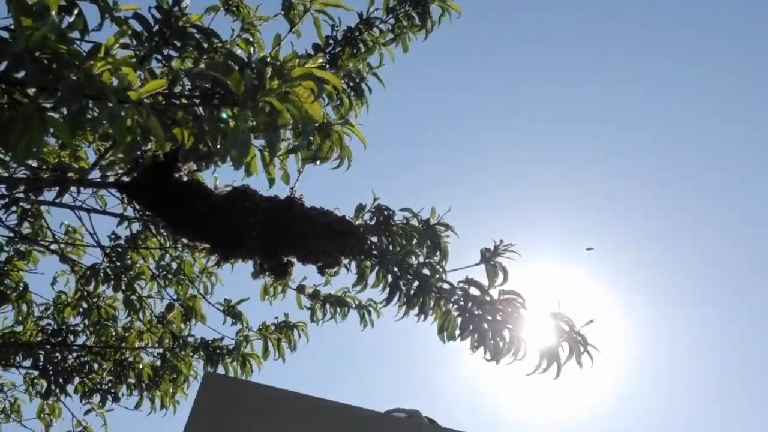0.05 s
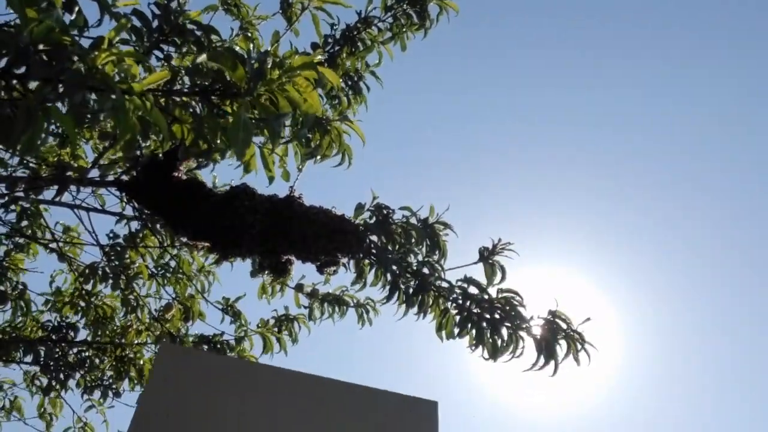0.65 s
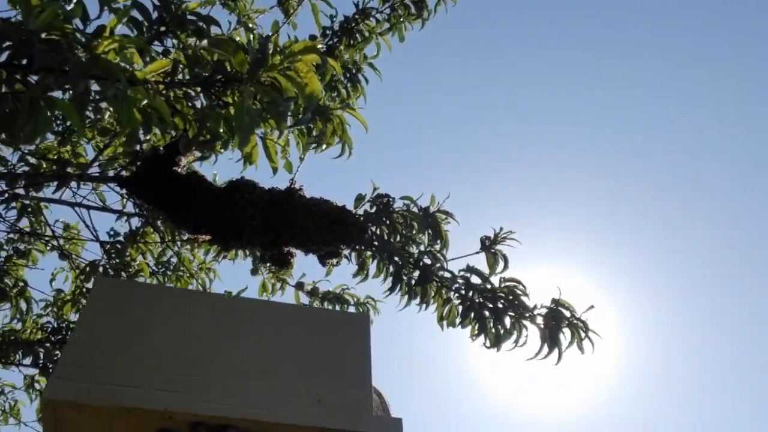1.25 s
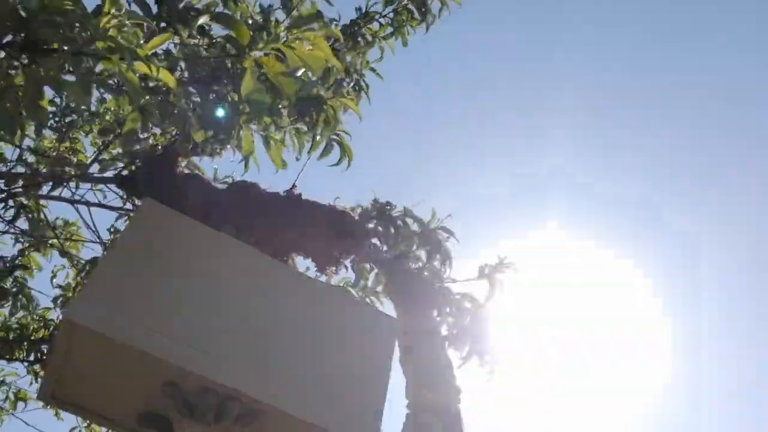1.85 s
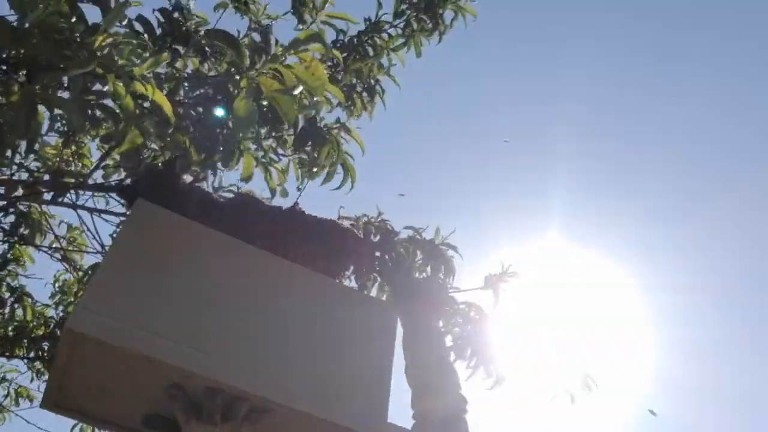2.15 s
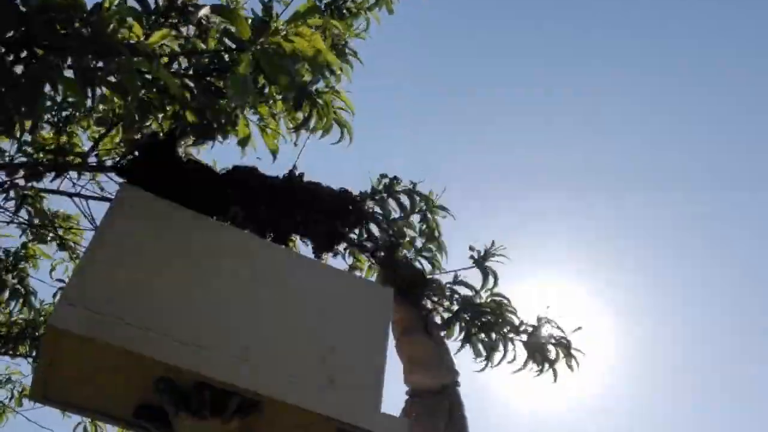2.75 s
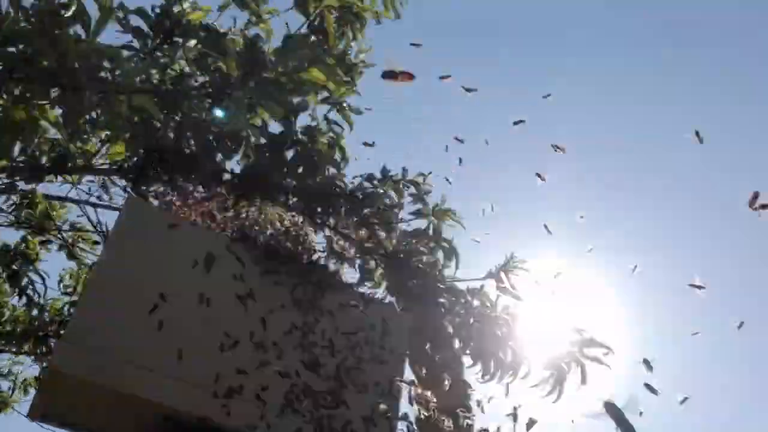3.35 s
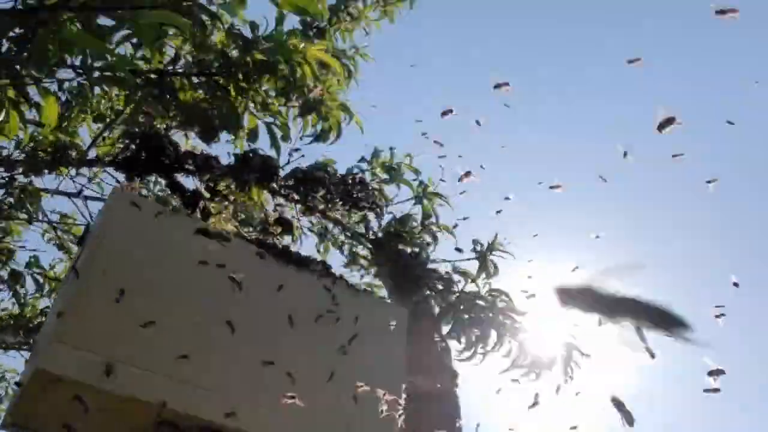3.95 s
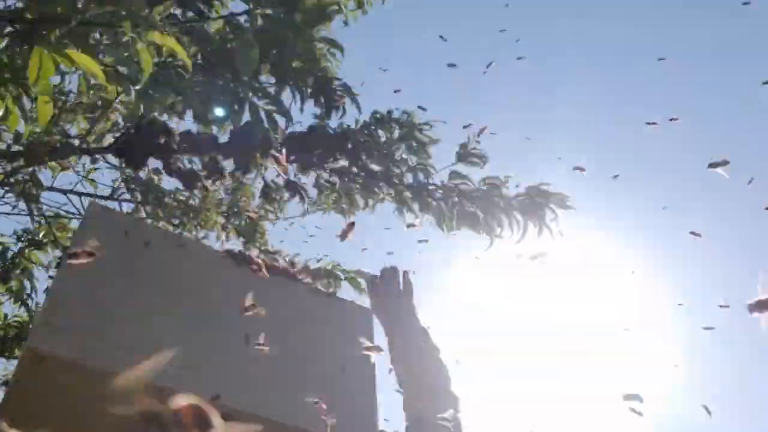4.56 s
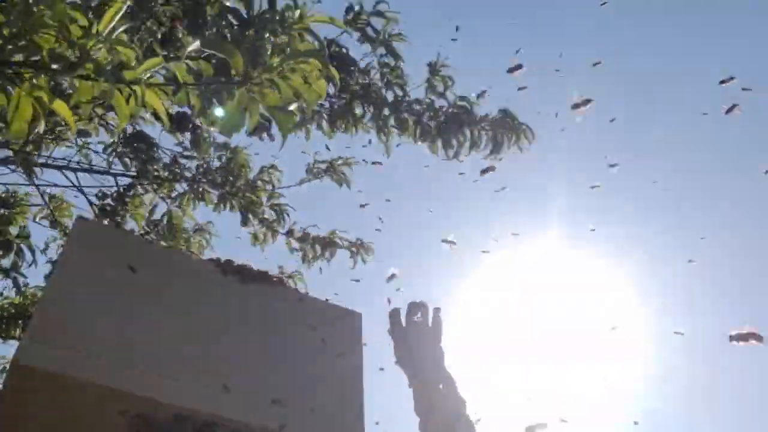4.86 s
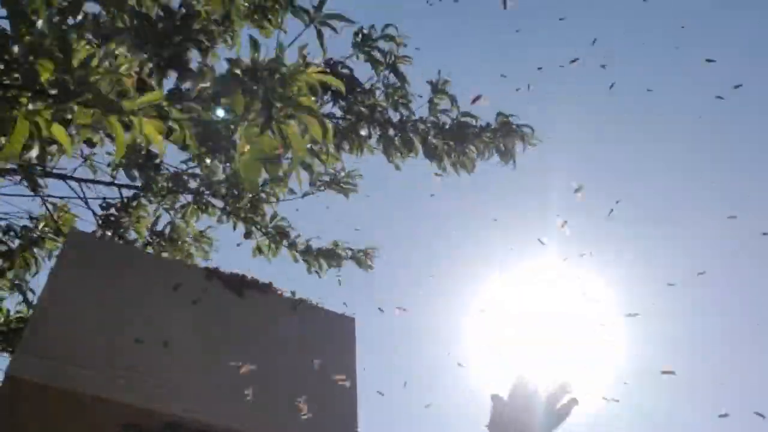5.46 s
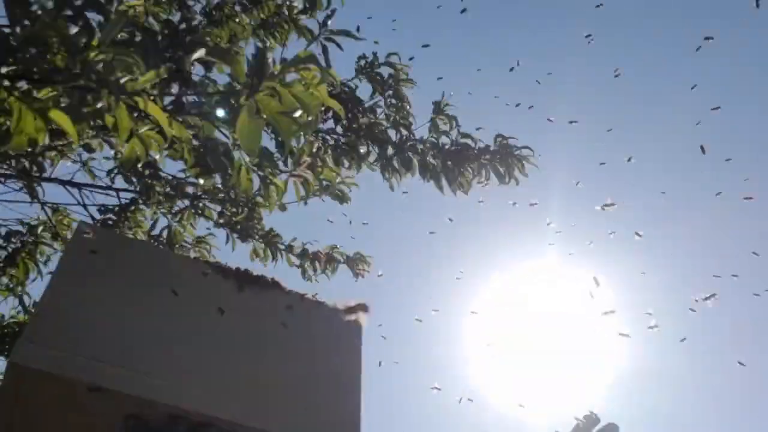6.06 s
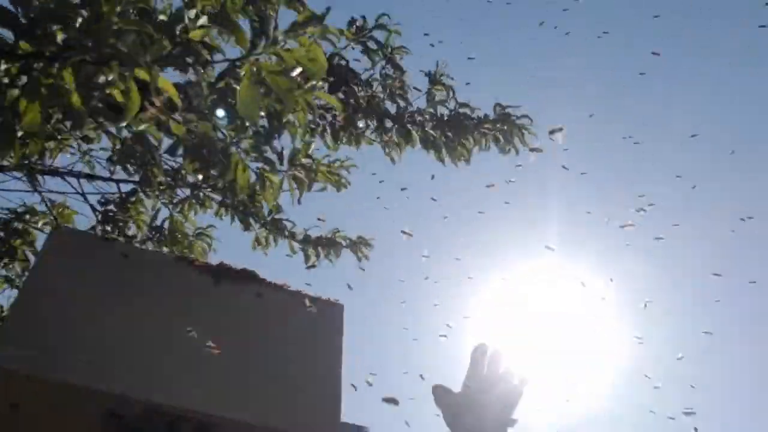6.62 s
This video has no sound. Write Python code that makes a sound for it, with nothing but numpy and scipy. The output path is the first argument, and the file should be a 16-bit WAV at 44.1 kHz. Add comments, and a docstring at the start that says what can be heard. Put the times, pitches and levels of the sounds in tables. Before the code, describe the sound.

Low, gusty wind buffets the microphone throughout, over a faint outdoor hiss. In the first 1.5 seconds, cloth and leaves brush softly as a wooden box is handled, with light knocks, small ticks and faint hollow creaks. The wind grows stronger from 1.5 seconds and thumps hardest around 2.6 seconds, along with two dull bumps of the box. At about 2.8 seconds a branch is shaken: a hissing rush of leaves and wings bursts out and bees begin to buzz. Between 3.5 and 4.5 seconds, leaves crinkle, twigs snap sharply and falling bees patter and tap into the box. From about 4.5 seconds the crinkling stops and the rush gradually settles. The wavering buzz of the flying swarm continues until the end, near 6.7 seconds, with single bees zipping briefly past the microphone over the wind rumble.

```python
"""Wind buffets two microphone ports from the start, and throughout. A beekeeper lifts a wooden box
under a swarm hanging in a tree: cloth and leaves rub, and knocks ring the modes of the box.
At 2.8 s the branch is shaken. Wings and leaves burst into a rush of friction noise, twigs snap,
and falling bees patter into the box. From about 4.5 s the crinkling stops and the rush settles,
leaving the harmonic buzz of the flying swarm, with single bees passing close."""
import sys
import numpy as np
from scipy import signal
from scipy.fft import rfft, irfft, next_fast_len
from scipy.io import wavfile
from scipy.ndimage import uniform_filter1d

SR = 44100
rng = np.random.default_rng(int(sys.argv[2]) if len(sys.argv) > 2 else 0)


def generate_wav(sig):
    """Save sig (samples, or channels by samples) to the path in sys.argv[1] as 16-bit PCM at SR."""
    pcm = np.round(np.clip(np.atleast_2d(sig).T, -1, 1) * 32767).astype(np.int16)
    wavfile.write(sys.argv[1], SR, pcm)


N = 295029
T = np.arange(N) / SR
SHAKE_S, SHAKE_RELEASE_S = 2.822, 0.2  # onset of the shaking; decay time of leaves and falling bees

# Levels in the tables are relative; pan_db is left minus right.
# spectrum of distant outdoor air: frequency_hz, level_db
AIR_SPECTRUM = [(100, 4.5), (400, -4), (750, -8.5), (1100, -14.5), (1600, -26), (3000, -39.5), (8000, -56)]
# spectrum of microphone hiss: frequency_hz, level_db
HISS_SPECTRUM = [(500, -10), (2000, -4.5), (3200, -1.5), (5600, 4.5), (7200, 2.5), (10000, -4), (12500, 1),
                 (16000, -0.5)]
# spectrum of large eddies: frequency_hz, level_db
LARGE_EDDY_SPECTRUM = [(20, -31), (40, -3.5), (64, 3.5), (110, -1.5), (160, -8.5), (230, -16), (400, -42),
                       (1000, -43), (2000, -78)]
# spectrum of small eddies: frequency_hz, level_db
SMALL_EDDY_SPECTRUM = [(80, -5.5), (180, 3), (260, 0), (350, -4), (450, -9), (600, -25.5), (1000, -37),
                       (2000, -61.5)]
# gusts on the ports: start_s, length_s, large_eddy_db, small_eddy_db, pan_db
WIND_GUSTS = [(0, 0.18, -44, -60, 4), (0.189, 0.18, -37.5, -50.5, 6.5), (0.426, .1, -40.5, -67, 10),
              (0.614, 0.064, -47, -49, 2), (0.782, 0.11, -37.5, -69, -6), (0.924, 0.28, -35.5, -74, 0.5),
              (1.223, 0.24, -38, -71, 7), (1.478, 0.13, -29, -41.5, 1.5), (1.628, 0.12, -30.5, -38, 2.5),
              (1.767, 0.16, -30, -41, 3), (1.96, 0.11, -35.5, -48, 0), (2.125, 0.08, -31.5, -39.5, 0.5),
              (2.238, 0.085, -35.5, -39.5, -4), (2.342, 0.14, -38.5, -44, 0.5),
              (2.509, 0.13, -26.5, -31.5, 2.5), (2.648, 0.072, -26, -30.5, 2),
              (2.745, 0.021, -30, -29.5, 5), (2.793, 0.34, -35, -40.5, 0.5), (3.092, 0.22, -33, -42, 3),
              (3.344, 0.11, -30, -41.5, 3), (3.474, 0.093, -33, -32.5, -3.5),
              (3.606, 0.028, -21.5, -34.5, 3), (3.676, 0.083, -32.5, -32.5, 3.5),
              (3.76, 0.063, -30, -43, 2), (3.894, 0.046, -30, -30.5, -8), (4.027, 0.12, -32, -40.5, 9),
              (4.174, 0.16, -34, -39.5, -0.5), (4.382, 0.046, -30, -28, 5), (4.451, 0.048, -32, -38, -3),
              (4.534, 0.073, -35, -41, 3.5), (4.64, 0.075, -35.5, -48, -7), (4.733, 0.043, -34.5, -51, -3),
              (4.792, .04, -36, -50, -10), (4.849, 0.045, -32, -44, 1), (4.908, 0.067, -34, -43.5, 0.5),
              (4.999, 0.029, -32, -33.5, -1.5), (5.046, 0.12, -37, -48, -16), (5.195, 0.018, -34, -39.5, 3),
              (5.237, 0.1, -38, -42, -1.5), (5.364, 0.087, -39.5, -46.5, -1.5), (5.472, 0.025, -35, -48, 4),
              (5.565, 0.13, -38.5, -45, 0), (5.656, 0.075, -31.5, -40.5, -1.5),
              (5.745, 0.067, -35.5, -42.5, 0.5), (5.841, 0.023, -40, -40, -4),
              (5.886, 0.053, -32, -44.5, -0.5), (5.959, 0.02, -38, -43, -6), (6.026, 0.016, -38, -44, 0),
              (6.06, 0.027, -43, -54, -18), (6.109, 0.043, -30.5, -43, -10.5), (6.18, 0.026, -30, -33, 8),
              (6.223, 0.033, -41, -44, -9), (6.332, 0.11, -32.5, -51, -2), (6.428, 0.06, -37.5, -45, -2),
              (6.51, 0.023, -37.5, -55, -8), (6.574, 0.049, -35.5, -46.5, -1),
              (6.648, 0.057, -35, -41, -1.5)]
# puffs of air on the ports: centre_s, level_db, pitch_hz, pan_db
AIR_PUFFS = [(1.704, -16, 67.3, -7), (1.81, -19.5, 59, -6), (1.845, -22, 64.6, -8), (2.19, -25, 76, -2),
             (2.548, -9, 104, 2), (2.6, -18, 108, -1), (2.676, -12.5, 94, 4), (3.098, -16.5, 117, 2),
             (3.209, -18.5, 122, -2), (3.63, -16, 83, 5), (3.795, -16, 82, 5), (4.031, -15.5, 56, 3),
             (4.105, -22, 100, 4), (4.135, -17, 100, -4), (4.553, -22, 64, -2), (4.861, -23.5, 60.6, -3),
             (5.006, -18.5, 85, 3), (5.208, -19, 70.5, 1), (5.246, -33, 72, 4), (6.195, -16.5, 81, -2)]
# spectrum of sliding cloth and leaves: frequency_hz, level_db
BRUSH_SPECTRUM = [(300, 12.4), (1000, 5.8), (2500, 3.4), (5500, 7.8), (7500, 11), (10000, 1), (13000, 8.1),
                  (16000, 6.6)]
# sleeves, leaves and twigs brushing past: centre_s, half_width_s, level_db
BRUSHES = [(.005, 0.015, -53), (.212, 0.0048, -52), (.335, 0.066, -52), (.47, 0.038, -53),
           (.546, 0.017, -43), (.612, 0.037, -41), (.695, 0.047, -48), (.98, 0.083, -53.5),
           (1.11, 0.13, -54.5), (1.39, 0.21, -60.5), (2.7, 0.29, -59), (3.585, 0.019, -40.5)]
# short hollow creaks of the box: centre_s, half_width_s, level_db
CREAKS = [(.153, 0.0064, -44), (.175, 0.0051, -41), (.193, 0.018, -49.5), (.237, 0.0033, -45),
          (.545, 0.035, -48.5), (.615, 0.022, -50.5), (.69, 0.033, -51.5), (1.325, 0.041, -51),
          (1.343, 0.0034, -41), (1.365, 0.017, -50), (1.405, 0.014, -51)]
# low modes of the box: pitch_hz, t60_s, level_db
BOX_MODES = [(189, 0.14, -2.5), (234, 0.099, 0), (298, 0.023, -8)]
# dull bumps of the box against the hand: start_s, level_db, pan_db
BOX_BUMPS = [(0.317, -19.5, 0), (.468, -23, 1), (0.525, -22, -1), (0.541, -24.5, 1), (0.7, -16, 1),
             (2.653, -14.5, -3), (2.748, -16, -4), (3.904, -24, -17), (4.389, -31, 7)]
# taps of hand, twigs and clumps of bees on the box: start_s, ring_db, pitch_hz, crack_db, t60_s
BOX_TAPS = [(.314, -36, 890, -38, 0.04), (.355, -41, 1240, -42, 0.034), (.467, -44, 1300, -40, .02),
            (.475, -40, 1300, -38, .02), (0.545, -38, 1100, -36, 0.016), (0.686, -38, 1730, -53, 0.056),
            (0.698, -45, 1000, -37.5, 0.025), (3.477, -28, 844, -44, 0.04), (3.512, -33, 900, -44, .025),
            (3.533, -33, 1030, -42, 0.025), (3.656, -29.5, 900, -44, 0.054), (3.741, -37, 2100, -35, 0.033),
            (3.746, -29, 990, -40, .03), (3.774, -35, 810, -41, 0.03), (3.889, -37, 804, -29, .04),
            (3.951, -35, 950, -42, .02), (4.156, -25, 690, -26, 0.034), (4.171, -32, 900, -31, 0.052),
            (4.421, -30.5, 775, -34, 0.047), (4.427, -30, 1320, -39, 0.025)]
# ticks of twigs and bees striking: start_s, swing_db, pitch_hz, decay_s, crack_db, crack_hz, pan_db
TWIG_SNAPS = [(.5224, -33.5, 1200, 0.00073, -27, 7000, 2), (0.5397, -38, 1310, 0.00046, -29, 9000, 3),
              (0.552, -36, 1330, 0.00053, -36, 5500, 2), (0.597, -34, 1800, 0.00032, -38, 9000, 3),
              (2.833, -49, 2200, .0004, -35, 5000, 4), (2.928, -41, 2000, 0.00073, -29, 5700, -10),
              (2.961, -47, 2000, .0004, -29, 6100, 0), (3.4747, -20, 930, 0.00043, -37, 4000, 0),
              (3.4857, -21, 1890, 0.00014, -38, 3600, -2), (3.5234, -31, 1170, 0.0003, -32, 5000, 12),
              (3.5292, -39, 1500, .0004, -31, 5000, 14), (3.532, -22.5, 1080, 0.0002, -31, 6000, 14),
              (3.7708, -30, 860, .0012, -42, 4000, -2), (3.8575, -31.5, 880, 0.00095, -34, 4030, 0),
              (3.8818, -24, 730, 0.0018, -28, 5000, 5), (3.8842, -20.5, 2220, 0.00024, -18, 7540, 2),
              (4.0101, -18.5, 2060, 0.0004, -24.5, 2680, 3), (4.158, -37, 1200, 0.00093, -25.5, 5800, 0),
              (4.1594, -27.5, 1320, 0.00061, -23.5, 4000, -1), (4.1675, -25, 1500, .0004, -29, 5000, -7),
              (4.1689, -17.5, 1000, 0.00029, -23, 4170, 1), (4.259, -36, 2000, .0004, -28.5, 5000, 1),
              (4.4548, -33, 1800, 0.00036, -26, 6000, -5), (4.4577, -32, 2220, 0.00052, -29.5, 6000, -5)]
# resonances of a crinkling leaf: centre_hz, width_hz, level_db
LEAF_MODES = [(1090, 420, 0.5), (1690, 860, -3), (2420, 1000, -3), (6000, 1500, -3.5)]
# spectrum of bees landing in the box: frequency_hz, level_db
PATTER_SPECTRUM = [(100, -41), (280, -6), (420, 9), (550, 9.5), (750, 9), (1300, -7), (2500, -25),
                   (6000, -17), (14000, -48)]
# spectrum of wings and leaves rustling: frequency_hz, level_db
RUSH_SPECTRUM = [(200, 10), (500, 4), (900, 8.5), (1600, 5), (3000, 0), (4400, 0.5), (5800, 4), (7000, 1.5),
                 (10000, 0), (12500, 2.5), (14000, 0.5), (16000, 0.5)]
# leafy twigs swinging through the air: centre_s, half_width_s, level_db
TWIG_SWISHES = [(2.85, 0.054, -46.5), (2.93, 0.011, -40.5), (3.15, 0.12, -43.5), (4.42, 0.037, -44.5),
                (4.91, 0.02, -45.5), (5.25, 0.96, -48), (6.5, 0.96, -51)]
# bees passing close: centre_s, wingbeat_hz, level_db, half_width_s, bend_ratio, upper_db, upper_hz
BEE_PASSES = [(3.215, 228, -51.5, 0.023, .03, 10, 1180), (3.51, 200, -45.5, 0.051, 0.004, -12, 800),
              (3.67, 186, -55, .025, .02, 8, 930), (3.721, 214, -49.5, 0.025, -.02, 7, 860),
              (3.903, 215, -36, 0.012, -0.1, -21, 800), (4.098, 200, -58, 0.018, 0, 1, 905),
              (4.3, 190, -52, 0.023, .02, -1, 750), (4.663, 215, -54, 0.031, 0.012, -8, 850),
              (4.898, 207, -49, 0.027, 0.04, 11, 850), (5.033, 211, -45.5, 0.0277, .09, -21, 1100),
              (5.317, 207, -57, .025, -0.02, 10, 1040), (5.412, 186, -46, 0.022, .05, -8, 910),
              (5.512, 188, -48, .022, -.01, -10, 755), (5.593, 231, -53, .025, .02, 12, 1140),
              (5.714, 186, -58, 0.027, -0.02, 2, 1100), (5.84, 199, -53, 0.056, .04, 0, 1080),
              (5.89, 207, -49.5, 0.027, .04, -9, 820), (6.029, 228, -59, .022, 0, 12, 920),
              (6.121, 172, -53, 0.017, -0.02, -3, 860), (6.427, 205, -46, 0.027, .12, -11, 1150),
              (6.494, 204, -41, 0.011, 0.043, -14, 800), (6.627, 210, -52, 0.028, -0.03, -2, 1280)]
# spectral envelope of the buzz: frequency_hz, level_db
BUZZ_SPECTRUM = [(120, -19), (210, -14.5), (340, 4.5), (430, 0.5), (520, -2.5), (620, -9), (850, -4.5),
                 (1300, -11.5), (2200, -21.5), (5000, -28)]
# bands of the buzz that flare as bees turn: centre_hz, width_hz
BUZZ_BANDS = [(345, 71), (410, 100), (480, 90), (800, 180), (1100, 320), (1550, 290)]
# response of the duller right port: frequency_hz, gain_db
RIGHT_RESPONSE = [(100, 2), (400, -1), (4500, 0.5), (8000, -2), (15000, -4)]


def undb(db):
    """Amplitude ratio for a level in decibels."""
    return 10 ** (np.asarray(db) / 20)


def unit(x):
    """Normalisation to an rms of 1."""
    return x / np.sqrt(np.mean(x ** 2) + 1e-20)


def steady(x, span_s):
    """Division by the running rms evens out the level."""
    return x / np.sqrt(uniform_filter1d(x ** 2, int(span_s * SR)) + 1e-12)


def colour(x, points):
    """Spectral shaping by a curve of (frequency_hz, level_db) points."""
    hz, db = np.transpose(points)
    size = next_fast_len(N + 4096)
    bin_hz = np.maximum(np.fft.rfftfreq(size, 1 / SR), 1)
    gain = undb(np.interp(np.log(bin_hz), np.log(hz), db))
    return irfft(rfft(x, size) * gain, size)[..., :N]


def ring(x, hz, width_hz):
    """Second-order resonance, gain 1 at its centre."""
    return signal.lfilter(*signal.iirpeak(hz, hz / width_hz, fs=SR), x)


def ring_twice(x, hz, width_hz):
    """Two equal resonances in cascade give steeper skirts."""
    return ring(ring(x, hz, width_hz), hz, width_hz)


def walk(rate_hz):
    """Slow random modulation with a spread near 1."""
    knots = rng.standard_normal(1024)
    return 1.2 * np.interp(T * rate_hz, np.arange(len(knots)), knots)


def noise():
    """Uncorrelated white noise at the two ports."""
    return rng.standard_normal((2, N))


def blend(pair, correlation):
    """Mid-side mixing correlates two independent channels."""
    c = np.clip(correlation, -.99, .99)
    mid, side = np.sqrt((1 + c) / 2) * pair[0], np.sqrt((1 - c) / 2) * pair[1]
    return np.array([mid + side, mid - side])


def pan(db):
    """Constant-power gains for a left-minus-right level difference."""
    gains = undb(np.array([[.5], [-.5]]) * db)
    return gains / np.sqrt(np.mean(gains ** 2, axis=0))


def grains(per_s, spread_db):
    """Shot noise: tiny random impacts, a few much larger than the rest."""
    sizes = undb(spread_db * np.minimum(rng.exponential(size=(2, N)), 5))
    hits = rng.random((2, N)) < per_s / SR
    return unit(hits * sizes * np.sign(noise()))


def swells(rows):
    """Gaussian envelopes summed from rows of (centre_s, half_width_s, level_db)."""
    return sum(undb(db) * np.exp(-2 * ((T - s) / width) ** 2) for s, width, db in rows)


def envelope(start_s, length_s, attack_s, release_s):
    """Linear rise, a hold until the length is over, then exponential decay."""
    rise = np.clip((T - start_s) / attack_s, 0, 1)
    return rise * np.exp(-np.maximum(T - start_s - length_s, 0) / release_s)


def damping(age, t60_s):
    """Exponential decay, 60 dB down after t60_s."""
    return np.exp(-np.log(1000) * age / t60_s)


def at_peak(x, db):
    """Normalisation to a peak level."""
    return undb(db) * x / abs(x).max()


def falling():
    """Flux of bees off the branch, 0-1: it builds, holds and dries up."""
    return envelope(SHAKE_S, length_s=1.43, attack_s=0.65, release_s=SHAKE_RELEASE_S)


def background():
    """Noise floor: distant outdoor air and the steady self-noise of the microphone."""
    air = unit(colour(blend(noise(), 0.45), AIR_SPECTRUM)) * undb(-50.5 + 1.3 * walk(12))
    hiss = unit(colour(noise(), HISS_SPECTRUM)) * undb(-58) * pan(2.4)
    return air + hiss


def wind(attack_s=0.011, release_s=0.012):
    """Turbulence strikes each port on its own: large eddies thud, small ones flutter."""
    # a light breeze, the draught of the falling bees and the gusts add in power
    draught = falling()
    thud_power = undb(-49) ** 2 + (undb(-39.5) * draught) ** 2
    flutter_power = undb(-62.5) ** 2 + (undb(-40.5) * draught) ** 2
    for start_s, length_s, large_db, small_db, pan_db in WIND_GUSTS:
        gust = envelope(start_s - attack_s / 2, length_s, attack_s, release_s) * pan(pan_db)
        thud_power = thud_power + (undb(large_db) * gust) ** 2
        flutter_power = flutter_power + (undb(small_db) * gust) ** 2
    large = steady(blend(colour(noise(), LARGE_EDDY_SPECTRUM), 0.028), span_s=0.0464)
    small = unit(colour(noise(), SMALL_EDDY_SPECTRUM) * undb(3.87 * np.array([walk(60), walk(60)])))
    thud = large * np.sqrt(thud_power) * undb(-1.74 + 0.77 * walk(24))
    return thud + small * np.sqrt(flutter_power) * undb(1)


def puffs(half_width_cycles=0.67, gain_db=-4, skew_cycles=0.13):
    """A puff is a pressure wave packet of a cycle or two, a little out of phase between the ports."""
    out = np.zeros((2, N))
    draws = rng.standard_normal((len(AIR_PUFFS), 2))
    for (centre_s, db, hz, pan_db), (offset, lag) in zip(AIR_PUFFS, draws):
        near = abs(T - centre_s) < .06
        cycles = (T[near] - centre_s) * hz
        phase = cycles + offset + skew_cycles * lag * np.array([[1], [-1]])
        packet = np.exp(-(cycles / half_width_cycles) ** 2) * np.cos(2 * np.pi * phase)
        out[:, near] += undb(db + gain_db) * pan(pan_db) * packet
    return out


def handling():
    """Stick-slip friction: cloth and leaves slide near the left port; the box rubs and creaks."""
    lifting = np.interp(T, [1.44, 1.52], [1, 0])
    slips = unit(colour(noise() + 1.15 * grains(1500, 3.4), BRUSH_SPECTRUM))
    brush = slips * (undb(-63) * lifting + swells(BRUSHES)) * pan(3.2)
    # a sleeve sliding lightly up the arm gives only a high whisper
    sleeve = unit(ring_twice(noise(), 13000, 6000)) * swells([(1.085, 0.19, -54.5)]) * pan(7.8)
    # a brief burst of noise at the very start, then a soft steady rub
    rub_level = undb(-61) * lifting + undb(-50.5) * np.exp(-T / 0.018)
    rub = unit(ring(ring(noise(), 990, 2100), 990, 2200)) * rub_level * undb(1.5 * walk(13.9))
    friction = blend(noise(), 0.99)
    upper = ring(ring(friction, 876, 160), 730, 180)
    lower = ring(ring(friction, 430, 190), 290, 250)
    creak = unit(upper + 0.92 * lower) * swells(CREAKS) * undb(1.5)
    return brush + sleeve + rub + creak


def bumps(gain_db=-9, contact_s=0.0013, detune=0.045):
    """Modal vibration: a soft blow excites the damped low modes of the wooden box."""
    out = np.zeros((2, N))
    age = T[:8192]
    push = 1 - np.exp(-age / contact_s)
    for start_s, db, pan_db in BOX_BUMPS:
        modes = 0
        for hz, t60_s, mode_db in BOX_MODES:
            pitch_hz = hz * (1 + detune * rng.standard_normal())
            modes += undb(mode_db) * damping(age, t60_s) * np.sin(2 * np.pi * pitch_hz * age)
        start = int(start_s * SR)
        out[:, start:start + len(age)] += pan(pan_db) * at_peak(push * modes, db + gain_db)
    return out


def taps(ring_gain_db=-2, crack_gain_db=-1, quality=1.33):
    """Impact excitation: a short crunch rings the wall of the box, with a bright crack on top."""
    out, size = np.zeros((2, N)), 4096
    draws = rng.standard_normal((len(BOX_TAPS), 2, size))
    for (start_s, ring_db, hz, crack_db, t60_s), white in zip(BOX_TAPS, draws):
        crunch = white * damping(T[:size], t60_s)
        wall = ring_twice(blend(crunch, 0.32), hz, hz / quality)
        # the shorter the contact, the wider the band of its crack
        crack = ring(blend(crunch, 0.11), 4000, np.clip(90 / t60_s, 1000, 12000))
        tap = at_peak(wall, ring_db + ring_gain_db) + at_peak(crack, crack_db + crack_gain_db)
        start = int(start_s * SR)
        out[:, start:start + size] += tap
    return out


def snaps(crack_t60_s=0.0076, lag_s=0.00015):
    """A snap is a heavily damped oscillation, later at the right port, with a splintering crack."""
    out, size = np.zeros((2, N)), 1024
    age = np.maximum(T[:size] - np.array([[0], [lag_s]]), 0)
    draws = rng.standard_normal((len(TWIG_SNAPS), 2, size))
    for (start_s, db, hz, decay_s, crack_db, crack_hz, pan_db), white in zip(TWIG_SNAPS, draws):
        swing = age * np.exp(-age / decay_s) * np.sin(2 * np.pi * hz * age)
        splinters = blend(white, 0.27) * damping(age, crack_t60_s)
        crack = ring_twice(splinters, crack_hz, 1.2 * crack_hz)
        start = int(start_s * SR)
        out[:, start:start + size] += pan(pan_db) * (at_peak(swing, db) + at_peak(crack, crack_db))
    return out


def leaves(spurt_db=10.5):
    """Random impulses excite each resonance of the stiff leaves in spurts while the branch shakes."""
    crinkle = sum(ring(grains(650, 3.2), hz, width_hz) * undb(db + spurt_db * np.tanh(walk(26)))
                  for hz, width_hz, db in LEAF_MODES)
    shaking = envelope(SHAKE_S, length_s=1.73, attack_s=0.18, release_s=SHAKE_RELEASE_S)
    clumps = undb(3 * np.tanh(walk(19)))
    return unit(blend(crinkle, 0.32) * clumps) * undb(-52) * shaking


def patter(stream_db=-50, stragglers_db=-56):
    """Shot noise of falling bees, filtered by the floor of the box; stragglers keep landing."""
    landing = undb(stream_db) * falling() + undb(stragglers_db) * (T > SHAKE_S)
    impacts = blend(grains(320, 2.6), 0.55)
    return unit(colour(impacts, PATTER_SPECTRUM)) * landing


def rush(attack_s=0.086, settle_s=2.04):
    """Friction of thousands of wings, legs and leaves sums to broadband noise, most sibilant at first."""
    burst = undb(-44.5) * envelope(SHAKE_S, attack_s, attack_s, settle_s)
    settled = undb(-51.5) * np.clip((T - SHAKE_S) / attack_s, 0, 1)
    rustle = unit(colour(noise() + 0.7 * grains(1600, 1.5), RUSH_SPECTRUM))
    sibilance = ring(rustle, 6100, 1100) * np.interp(T, [3.15, 3.5], [.4, 0])
    # knots of bees tumble through the leaves and make the middle of the hiss flutter
    tumbling = ring(rustle, 1900, 4400) * 0.22 * walk(21)
    level = np.hypot(burst + settled, swells(TWIG_SWISHES)) * undb(0.5 * walk(22))
    return blend(rustle + sibilance + tumbling, 0.029) * level


def wingbeat(hz):
    """One sharp push of air per wing stroke: a pulse train, and so a harmonic series."""
    phase = np.cumsum(hz) / SR + rng.random()
    return np.diff(phase % 1, prepend=phase[0] % 1)


def close_bees(doppler=.02, waver=.018):
    """Spherical spreading swells a passing bee; its turn and the Doppler shift bend its pitch."""
    out = 0
    for centre_s, hz, db, half_width_s, bend, upper_db, upper_hz in BEE_PASSES:
        along = (T - centre_s) / half_width_s  # place on the path, in units of the closest distance
        beat = wingbeat(hz * (1 + (bend - doppler) * np.tanh(along) + waver * walk(50)))
        # the second harmonic, one push for each half stroke, carries furthest
        hum = unit(ring(ring(beat, 390, 150), 440, 450))
        # which upper harmonics speak depends on the bee's heading
        upper = undb(upper_db) * unit(ring(ring(beat, upper_hz, 420), 840, 1700))
        nearness = np.exp(-(along / 2) ** 2) / np.hypot(1, along)  # 1/distance, faded at both ends
        out = out + unit(hum + upper) * undb(db + 1.05 * walk(50)) * nearness
    return out * pan(4.2)


def swarm(count=17, beat_hz=199, nearness_db=20, flare_db=6, takeoff_s=0.11):
    """Incoherent sources add: each bee has its own wandering wingbeat and swells as it comes near."""
    chorus = np.zeros((2, N))
    for detune, side in zip(np.linspace(-.2, .2, count), rng.standard_normal(count)):
        pitch_hz = beat_hz * np.exp(detune + .055 * walk(15) + .013 * walk(80))
        bee = wingbeat(pitch_hz) * undb(nearness_db * np.tanh(.45 * walk(23)))
        # a bee off to one side reaches the ports at different moments
        chorus += np.array([bee, np.roll(bee, int(8 * side))])
    buzz = steady(colour(chorus, BUZZ_SPECTRUM), span_s=0.5)
    # directivity: bands flare and fade separately as slow and fast bees turn toward the ports
    for hz, width_hz in BUZZ_BANDS:
        band_gain = undb(flare_db * np.tanh(walk(18)) - 2)
        buzz = buzz + ring(buzz, hz, width_hz) * (band_gain - 1)
    airborne = 1 - np.exp(-np.maximum(T - SHAKE_S, 0) / takeoff_s)
    return buzz * undb(-48 + walk(13)) * airborne


def scene():
    """Superposition of all sources at the two ports."""
    return (wind() + puffs() + handling() + bumps() + rush() + leaves() + patter()
            + swarm() + close_bees() + taps() + snaps() + background())


def record(dry):
    """Cancellation at the ports notches the treble; the right is duller, and a low-pass cuts the top."""
    notched = dry - 0.64 * ring(dry, hz=8480, width_hz=4200)
    ports = np.array([notched[0], colour(notched[1], RIGHT_RESPONSE)])
    low_pass = signal.ellip(10, .2, 70, 15900, fs=SR, output="sos")
    return signal.sosfilt(low_pass, ports)


dry = scene()
out = record(dry)
generate_wav(out)
```